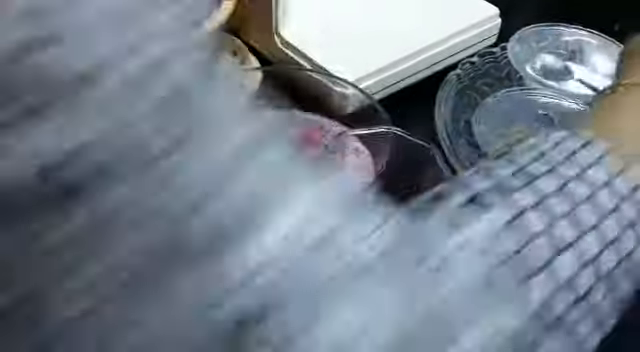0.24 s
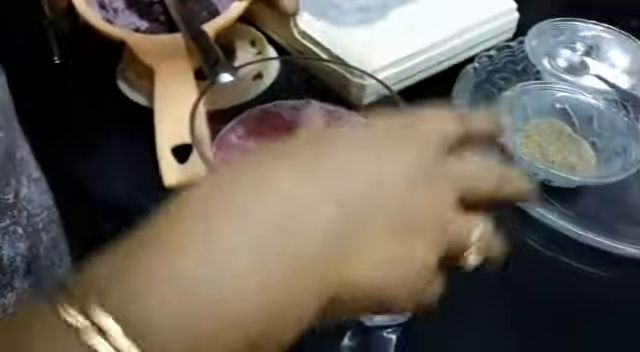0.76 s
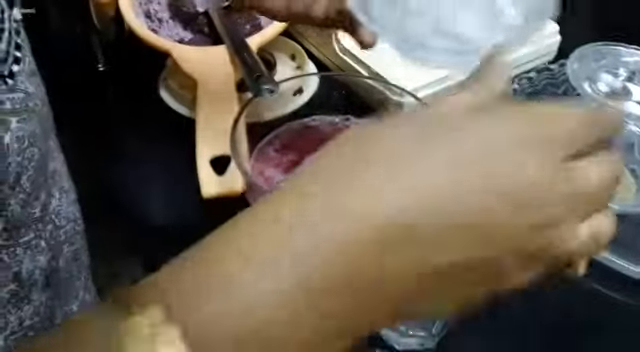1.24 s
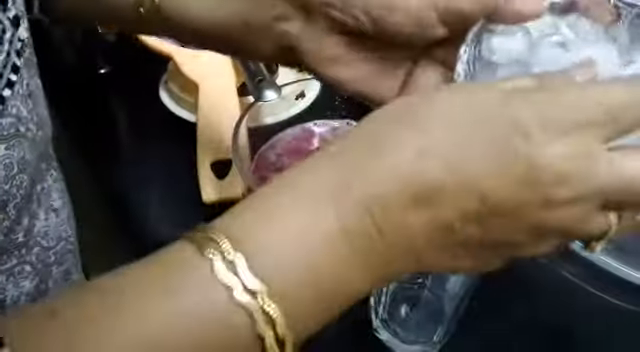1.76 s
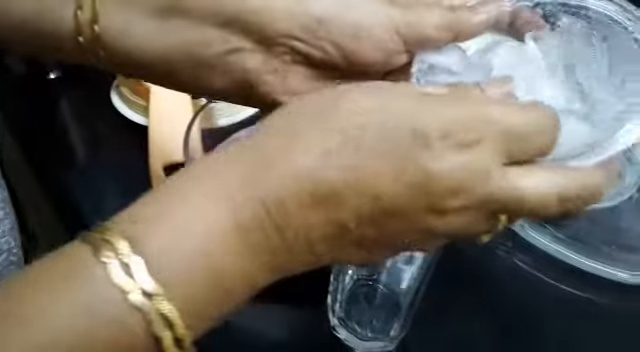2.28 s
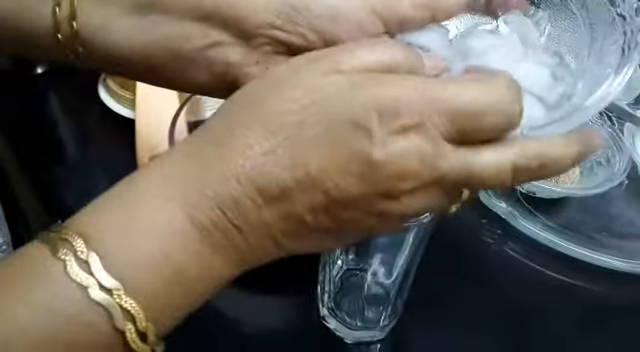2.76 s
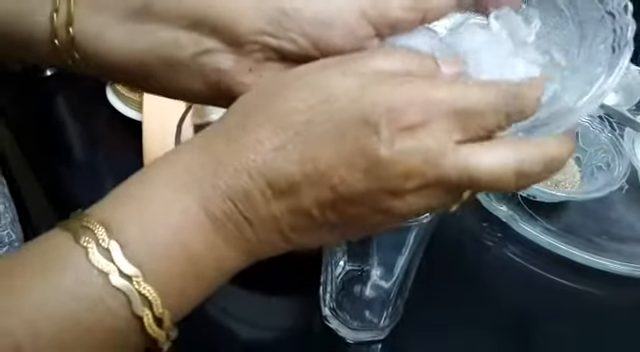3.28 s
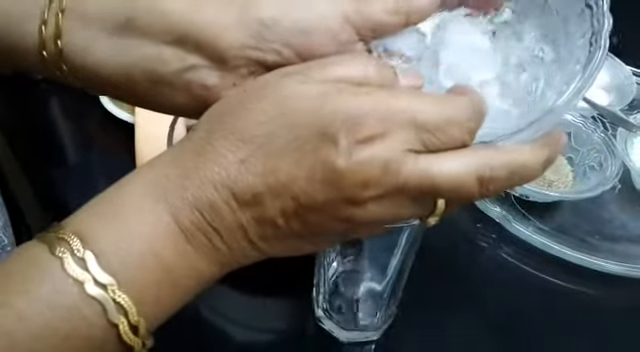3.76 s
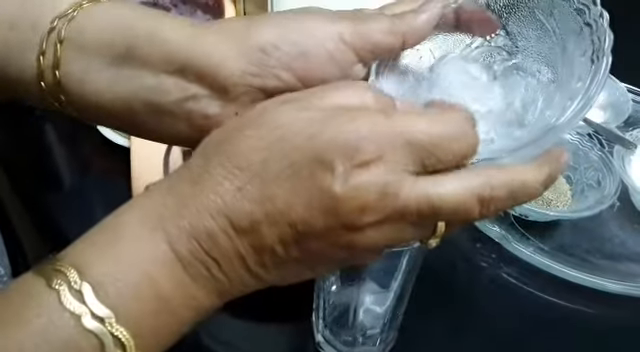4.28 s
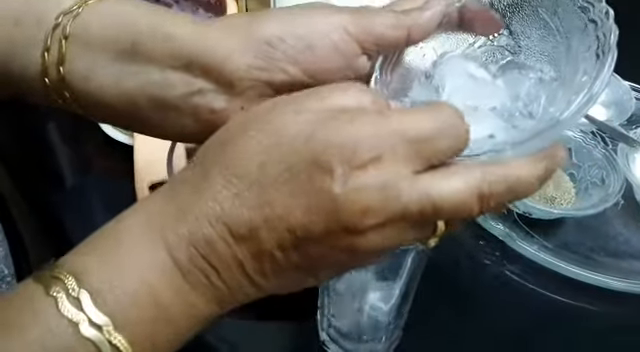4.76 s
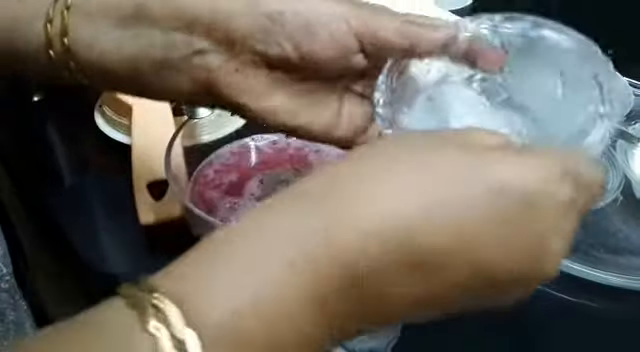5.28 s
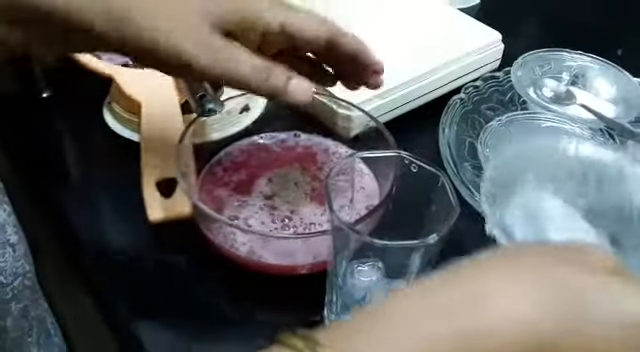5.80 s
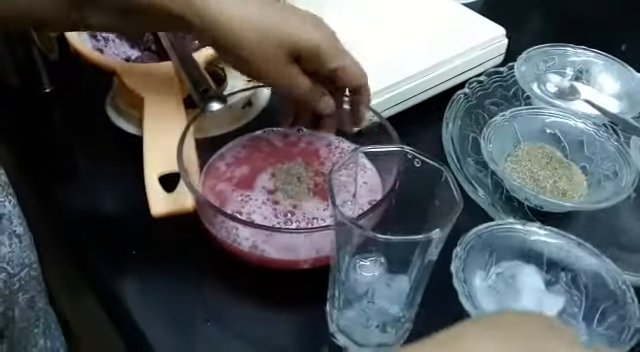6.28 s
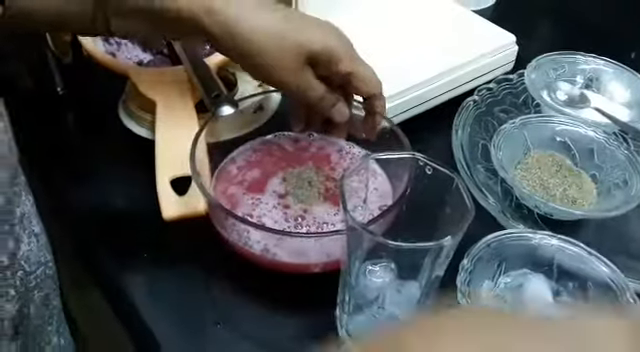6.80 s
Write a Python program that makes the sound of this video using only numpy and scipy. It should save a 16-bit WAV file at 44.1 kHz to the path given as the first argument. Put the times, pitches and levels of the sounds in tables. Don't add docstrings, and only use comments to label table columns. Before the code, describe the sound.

Close phone pickup in a small, hard kitchen with faint hum and hiss. A dish and metal spoon clatter rapidly to rest, then a tumbler is set down with soft knocks. Wet ice slides and ticks in a glass bowl; a few cubes drop into the tumbler, then a heavier cascade clacks and clinks. The bowl is moved, softly shifting its ice, and lands with hard, dull knocks.

```python
import sys
import numpy as np
from scipy import signal
from scipy.io import wavfile
from scipy.ndimage import uniform_filter1d, minimum_filter1d

SR = 44100
rng = np.random.default_rng(int(sys.argv[2]) if len(sys.argv) > 2 else 0)


def to_wav(s):
    ch = np.atleast_2d(s).T
    pcm = np.round(np.clip(ch, -1, 1) * 32767)
    wavfile.write(sys.argv[1], SR, pcm.astype(np.int16))


def level_to_linear(level):
    exponent = np.asarray(level, float) / 20
    return 10 ** exponent


N = 310905

# (time [s], first ring peak [dB], second, third and fourth ring against the first [dB])
CLINKS = [(1.1945, -42, -18, -33, -48), (2.3665, -20.5, 1.5, -22, -28), (2.5018, -46.5, -10, 10.5, -17),
          (2.94, -50, 12.5, -9, -9.5), (3.7712, -20.5, 9.5, -22.5, -18), (3.843, -42, -17, -11.5, -32),
          (4.0611, -18.5, -30, -24, -14.5), (4.0904, -22.5, -0.5, -23, -10.5),
          (4.156, -26, -5, -4.5, -12.5), (4.1676, -23.5, -2, -9.5, -7.5), (4.2372, -22.5, -2.5, -3.5, -2),
          (4.266, -22, -12, -10, -47), (4.648, -39.5, -10, -32.5, -12.5), (4.6799, -28.5, 6.5, -4, -12),
          (4.7147, -18, -16.5, 0.5, -9.5), (4.7852, -29, -5, -13.5, -27.5), (4.826, -30, -3.5, -13, -13),
          (4.8613, -28, -7, 5, -4), (4.8804, -25, -6.5, -5, -38), (4.905, -26.5, -19.5, -37, -30),
          (4.9506, -31.5, -19, -8, -30)]
# (frequency [Hz], level [dB], t60 [s])
TUMBLER_MODES = [
    [(2474, 0, .2), (2486, -1.5, .17)],
    [(4181, 0, .09), (4193, -1.5, .08)],
    [(6690, 0, .07), (6625, -3, .05), (6810, -8, .03), (7180, -12, .04), (7450, -12, .02)],
    [(8600, 0, .06), (9600, -12, .02), (10850, -6, .035), (12000, -11, .025), (12800, -7, .035),
     (14600, -12, .025)],
]
RING_EMPTY, RING_FILLED, FILLED_S = 1, 0.35, 3.5
# (start [s], peak [s], end [s], peak level [dB], fall [dB])
RUBS = [
    (1.197, 1.263, 1.4, -53, 15),
    (2.864, 2.96, 3.09, -58.5, 6),
]
# (time [s], clack peak [dB], thud and crack against the clack [dB])
DROPS = [(2.4618, -24.5, 3.5, -26), (2.471, -32, 1, -23), (2.4828, -17, -4, -7.5), (2.5032, -23, -6, -8),
         (2.5115, -30, 1, -22), (2.5265, -34, -3, -24), (3.8334, -28, 3, -20.5), (3.8395, -9, -9.5, -25.5),
         (3.8472, -13, -12.5, -22.5), (3.8542, -17.5, 0, -19.5), (3.872, -25, -6.5, -25),
         (3.8805, -24.5, -4, -27.5), (3.9075, -25, 2.5, -23), (3.9238, -19.5, -14.5, -24.5),
         (3.9455, -27.5, 5, -23.5), (4.0362, -31, -9, -16.5), (4.061, -21.5, 8, -0.5),
         (4.1538, -5, -6.5, -21.5), (4.173, -19.5, -6.5, -19.5), (4.1825, -12.5, -9, -18),
         (4.189, -12.5, -12, -7.5), (4.195, -19, -11.5, -18.5), (4.2625, -11, -7, -7),
         (4.2674, -12.5, -15.5, -15.5), (4.2734, -16.5, -5, -2.5), (4.295, -25, -12, -14.5),
         (4.6795, -15, 1.5, -20), (4.685, -17.5, -7.5, -26), (4.7126, -13.5, -10, -12.5),
         (4.7466, -27, 10, -12.5), (4.7535, -24.5, 1, -21.5), (4.785, -25, -8, -18), (4.8005, -23, -7, -19),
         (4.8262, -24.5, 0, -9), (4.841, -25.5, 5, -12), (4.8455, -22, 0, -2.5), (4.853, -19.5, -3, -14.5),
         (4.8595, -13, -10.5, -7.5), (4.879, -20.5, -3, -16), (4.883, -22, -4.5, -16),
         (4.9065, -22.5, -2, -30), (4.9352, -21.5, -2.5, -26), (4.951, -36, -6, -23)]
# (time [s], clack peak [dB])
TICKS = [(1.4222, -56), (1.56, -41), (1.883, -55), (1.8937, -40), (1.9145, -28.5), (1.922, -30.5),
         (1.9642, -30), (1.982, -33), (1.9963, -26), (2.136, -30.5), (2.2373, -34), (2.2555, -29.5),
         (2.2642, -31), (2.2736, -28), (2.3035, -33), (2.321, -31.5), (2.693, -53), (2.7122, -36),
         (2.793, -43), (3.3986, -46), (3.418, -44), (3.4874, -34.5), (3.5676, -39.5), (3.6185, -38.5),
         (3.6584, -36), (3.689, -30.5), (4.4991, -32), (4.572, -43), (4.6048, -28)]
# (time [s], clack peak [dB])
SNAPS = [
    (2.0547, -34.5),
    (3.022, -34.5),
    (3.987, -30.5),
]
TICK_THUD_DB, TICK_CRACK_DB, SNAP_CRACK_DB = -12, -24, -7
# (frequency [Hz], level [dB], t60 [s])
CUBE_MODES = [
    [(2800, -1.5, 0.0079), (3465, -5, 0.018), (4114, -5, 0.015), (4584, -7, 0.018), (5050, 1.5, 0.014),
     (5400, -9, 0.007), (3856, -7, 0.014), (3255, -13.5, 0.012)],
    [(840, -5.5, 0.003), (1190, -7.5, 0.011), (1440, -7, 0.012), (1576, -1.5, 0.012), (1778, -3.5, 0.02),
     (2290, 1.5, 0.015)],
    [(6564, 7, 0.0045), (7340, 0.5, 0.00037), (8860, -3.5, 0.0066), (10140, -1, 0.0042),
     (11250, -0.5, 0.004), (12230, 1, 0.0042), (14200, -23.5, 0.004)],
]
# (start [s], peak [s], end [s], peak level [dB], fall [dB])
SLIDES = [
    (1.871, 1.925, 2.17, -44.5, 17),
    (2.217, 2.264, 2.374, -48.5, 7),
    (3.362, 3.494, 3.66, -64.5, -9.5),
    (4.443, 4.596, 4.63, -43, 3),
    (5.258, 5.271, 5.41, -53, 36),
    (5.985, 6.156, 6.2, -49, 4),
]
# (start [s], peak [s], end [s], peak level [dB], fall [dB])
JOSTLES = [
    (2.44, 2, 2.87, -48.5, 10.4),
    (3.847, 3.94, 3.99, -34, 44),
    (4.148, 4.166, 4.476, -26, 45),
    (4.68, 6.9, 4.3, -41.5, 46),
]
SWELL_DB, SLIDE_THUD_DB, JOSTLE_THUD_DB = 13, -2.5, 3.5
# (time [s], ring peak [dB], thud against it [dB])
SETTLES = [
    (5.2729, -38.5, -5),
    (5.3201, -51, -4),
    (5.9918, -49, -18),
    (6.043, -38.5, -12),
    (6.1029, -29, -11.5),
    (6.1285, -47.5, 11.5),
    (6.1285, -33, -11),
    (6.1536, -36, -7),
]
# (frequency [Hz], level [dB], t60 [s])
BOWL_MODES = [
    [(3800, -5, 0.0059), (4355, 3, 0.0085), (4915, -2, 0.013), (5456, 0, 0.024), (5600, -15, 0.0066),
     (7100, -20, 0.0022)],
    [(1360, -1, 0.0064), (1630, 1.5, 0.007), (2192, -9, 0.044)],
]
# (time [s], peak [dB])
SLUMPS = [
    (5.5427, -47.5),
    (5.567, -46),
    (5.618, -52),
    (5.657, -50),
    (5.676, -51),
    (5.718, -51),
    (5.748, -54),
    (5.764, -44.5),
    (5.778, -49),
    (5.792, -49),
]
# (frequency [Hz], level [dB], t60 [s])
SLUMP_MODES = [
    [(363, -4, 0.017), (717, 3, 0.021), (950, 2.5, 0.027), (1154, -0.5, .02), (1400, -6, .012)],
]
# (time [s], knock peak [dB], edge against it [dB])
STEPS = [
    (0.9832, -40.5, -34),
    (1.0186, -44, -35),
    (1.076, -22, -27),
    (1.1573, -26, -15.5),
    (1.1942, -21.5, -14.5),
]
# (frequency [Hz], level [dB], t60 [s])
FOOT_MODES = [
    [(1136, -9.5, 0.036), (1420, -7.5, 0.029), (1540, -2.5, 0.02), (1855, 7.5, 0.013), (2045, -6, 0.023),
     (2270, 1.5, 0.01)],
    [(2740, -1, 0.0088), (3550, -8, 0.007), (4600, -12, 0.006), (5150, -13, 0.0048)],
]
# (time [s], peak [dB], ring length factor [1])
HOLLOWS = [(0.982, -46, 0.7), (1.075, -41, 0.83), (1.156, -39, 0.97), (1.193, -32.5, 1), (1.266, -37, 0.7),
           (3.945, -32, 0.57), (4.06, -33, 0.9), (4.266, -21.5, 0.18), (4.338, -30.5, 0.35),
           (4.684, -27, 0.16), (4.844, -53, 0.93), (5.782, -44, 0.15)]
# (frequency [Hz], level [dB], t60 [s])
HOLLOW_MODES = [
    [(792.6, -4, 0.12), (877, -9, 0.066)],
]
FILLED_PITCH, FULL_S = 1.07, 4.2
# (time [s], knock peak [dB], edge and bass against it [dB])
KNOCKS = [
    (6.5325, -4.5, -26, -25),
    (6.7447, -17.5, -17.5, -38),
    (6.748, -8, -22.5, -36),
    (6.7585, -16, -24, -33),
    (6.7615, -13.5, -19.5, -31),
    (6.7735, -22, -21, -26),
]
# (frequency [Hz], level [dB], t60 [s])
COUNTER_MODES = [
    [(1074, -10, 0.021), (1220, -8, 0.021), (1622, 2, 0.014), (1720, 8, 0.0054), (1952, -3, 0.012),
     (2165, -3, 0.017), (2550, -12.5, 0.0089)],
    [(2740, 8, 0.016), (3440, -19, 0.039), (3840, 0, 0.02), (3960, 0, 0.016), (4470, 2, 0.017),
     (5150, -13, 0.01), (5480, -3.5, 0.018)],
    [(259, -6, 0.018), (481, -10.5, 0.021)],
]
ROCK_S, ROCK_DB, ROCK_LOSS_DB, ROCK_EDGE_DB, ROCK_BASS_DB = 6.5809, -6.5, 2.5, -30, -21.5
ROCK_GAP_S, ROCK_SHRINK, ROCK_LAST_GAP_S = .017, .62, .0035
# (time [s], body peak [dB], edge against it [dB])
CLATTER = [(0.3092, -21, -4), (0.3135, -20, -14), (0.3195, -17, -10), (0.3245, -16, -10.5),
           (0.329, -11.5, -12), (0.335, -23, -11), (0.3395, -14.5, -12), (0.3465, -18, -12),
           (0.3562, -16, -9.5), (0.3615, -24, -12.5), (0.374, -21, -8), (0.3795, -18.5, -9.5),
           (0.388, -17.5, -8), (0.394, -20, -12), (0.4005, -20, -10.5), (0.4105, -24.5, -6.5),
           (0.4158, -25.5, -7.5), (0.4285, -26.5, -6)]
# (frequency [Hz], level [dB], t60 [s])
DISH_MODES = [
    [(950, -10, 0.016), (1113, -5.5, 0.026), (1287, -9.5, 0.022), (1590, -1, 0.027), (1750, 0, 0.022),
     (1957, -2.5, 0.031), (2190, -5, .02)],
    [(2590, -1, .02), (2840, -2.5, 0.025), (3310, -6, 0.013), (3860, -5.5, .015), (4370, -4.5, .015),
     (4800, -6, .015), (5470, -2.5, 0.022), (6100, -11.5, .01)],
]
# (start [s], peak [s], end [s], peak level [dB], fall [dB])
SHIVER = (0.74, .35, .54, -23, 19)
SHIVER_SWELL_DB, SHIVER_SPOON_DB = 4, -9
# (time [s], low ring peak [dB], middle and top rings against it [dB])
CHATTER = [(0.3077, -24, -12.5, -11.5), (0.3274, -25.5, -5.5, -18.5), (0.335, -25.5, -14, -20),
           (0.3546, -19, -15.5, -20), (0.3755, -21.5, -15, -18), (0.3865, -21.5, -16, -17.5),
           (0.403, -21, -16.5, -19.5), (0.4165, -24, -14, -24), (0.4285, -21.5, -24, -27.5),
           (0.4465, -25, -20, -29), (0.494, -26.5, -20, -32)]
# (frequency [Hz], level [dB], t60 [s])
SPOON_MODES = [
    [(5078, 0, .3), (5014, -4, .2), (4592, -9, .05), (5500, -3, .04), (7144, -22, .06)],
    [(8366, -7, .08), (9383, -5, .07), (9916, -9, .09), (10570, -10, .09), (10970, -9, .07),
     (11400, 0, .045), (12050, -6, .03)],
    [(12880, -4, .06), (13870, -3, .06), (15040, -1, .055)],
]
SPOON_RING = 0.66
# (time [s], peak [dB])
BANGLES = [
    (.5424, -36),
    (.5574, -36),
    (7.0184, -47),
]
# (frequency [Hz], level [dB], t60 [s])
BANGLE_MODES = [
    [(4470, -8, 0.035), (8900, -10.5, .04), (10900, -10, .02), (11980, 1, 0.028), (13100, -9, .025),
     (13900, -9, .02)],
]
UNEVEN_DB = 2
# (frequency [Hz], t60 [s])
KITCHEN_T60 = [(250, 0.99), (700, 0.73), (1700, 0.62), (4600, 0.55), (12000, 0.42)]
# (delay [s], level [dB])
ECHOES = [(.0045, -19.5), (.0072, -11), (0.01, -16), (0.0167, -30), (.021, -31.5)]
GLASS_WET_DB = -2.5
# (frequency [Hz], gain [dB])
MIC_GAIN = [(60, -8), (200, 3.5), (700, -4), (5000, -0.5), (5650, -5), (6000, -2.5), (8000, -1),
            (9000, -1.5), (16000, -1.5)]
# (frequency [Hz], density [dB per Hz])
AIR_SPECTRUM = [(25, -41), (100, -11.5), (160, -6), (260, -8), (430, -10.5), (600, -17.5), (1650, -20.5),
                (2500, -30), (4500, -41), (6500, -49.5), (8400, -38), (10500, -32.5), (15600, -33.5),
                (15900, -64)]
# (frequency [Hz], side against mid [dB])
SIDE_AIR = [(30, -10.5), (120, -20.5), (500, -15.5), (1650, -11.5), (5000, 1.5), (8000, -3), (15000, -2.5)]
AIR_DB = -57.5
WHINE_HZ, WHINE_WIDTH_HZ, WHINE_DB = 1740, 42, 8.5


def tumbler():
    clinks = [(*row, RING_EMPTY if row[0] < FILLED_S else RING_FILLED) for row in CLINKS]
    struck = blows(clinks, TUMBLER_MODES, detune=0.0045, rise=0.00046, trim_db=[-3.5, -2.5, 7.0, 8.5], uneven_db=3.8)
    return struck + rubs()


def rubs():
    level, _ = levels([stroke(*row, SWELL_DB, 0) for row in RUBS])
    size = round(RUBS[-1][2] * SR)
    return level * slips(TUMBLER_MODES[0], 400, 3, .1, .2, size=size, count=3)


def ice():
    ticks = [(*row, TICK_THUD_DB, TICK_CRACK_DB) for row in TICKS]
    snaps = [(*row, TICK_THUD_DB, SNAP_CRACK_DB) for row in SNAPS]
    clacks = DROPS + ticks + snaps
    return blows(clacks, CUBE_MODES, detune=0.086, rise=0.00019, trim_db=[-4, -3, 3], skid=.004) + slides()


def slides():
    in_bowl = [stroke(*row, SWELL_DB, SLIDE_THUD_DB) for row in SLIDES]
    in_tumbler = [stroke(*row, SWELL_DB, JOSTLE_THUD_DB) for row in JOSTLES]
    level, thud = levels(in_bowl + in_tumbler)
    size = round(SLIDES[-1][2] * SR)
    clack, low, crack = (slips(modes, 2000, 3.4, 0.065, 0.8, size=size, count=6) for modes in CUBE_MODES)
    return level_to_linear(-7.0) * (level * (clack + level_to_linear(-5.5) * crack) + thud * low)


def bowl():
    touches = blows(SETTLES, BOWL_MODES, detune=0.054, rise=0.00044, trim_db=[-1.5, -2.5])
    return touches + blows(SLUMPS, SLUMP_MODES, detune=0.18, rise=.002, trim_db=[0], uneven_db=5)


def foot():
    return blows(STEPS, FOOT_MODES, detune=0.047, rise=0.0019, trim_db=[-1.5, 1.5])


def hollow():
    fuller = [[(hz * FILLED_PITCH, db, t60) for hz, db, t60 in HOLLOW_MODES[0]]]
    early = [row for row in HOLLOWS if row[0] <= FULL_S]
    late = [row for row in HOLLOWS if row[0] > FULL_S]
    out = blows(early, HOLLOW_MODES, detune=0.13, rise=0.002, trim_db=[-3])
    return out + blows(late, fuller, detune=0.13, rise=0.002, trim_db=[-3])


def counter():
    return blows(KNOCKS + rocking(), COUNTER_MODES, detune=0.065, rise=0.00051, trim_db=[-1.5, 5, 1.5])


def rocking(count=9):
    k = np.arange(count)
    gaps = ROCK_LAST_GAP_S + ROCK_GAP_S * ROCK_SHRINK ** k
    times = ROCK_S + np.cumsum(gaps) - gaps
    return [(s, ROCK_DB - ROCK_LOSS_DB * n, ROCK_EDGE_DB, ROCK_BASS_DB) for n, s in enumerate(times)]


def dish():
    clatter = blows(CLATTER, DISH_MODES, detune=.05, rise=0.00053, trim_db=[-4, 3], uneven_db=5)
    level, spoon_level = levels([stroke(*SHIVER, SHIVER_SWELL_DB, SHIVER_SPOON_DB)])
    size = SR // 2 + 2000
    body, edge = (slips(modes, 1500, 2.5, .1, .8, size=size) for modes in DISH_MODES)
    spoon_groups = (SPOON_MODES[0], SPOON_MODES[1][:5] + SPOON_MODES[2])
    low, high = (slips(modes, 500, 3.0, .1, .22, size=size) for modes in spoon_groups)
    buzz = body + level_to_linear(-1.5) * edge
    jingle = low + level_to_linear(-2) * high
    return clatter + level_to_linear(-8.5) * (level * buzz + spoon_level * jingle)


def spoon():
    rows = [(*row, SPOON_RING) for row in CHATTER]
    return blows(rows, SPOON_MODES, detune=0.0053, rise=0.00074, trim_db=[-5, 3, 4], uneven_db=4.5)


def bangles():
    return blows(BANGLES, BANGLE_MODES, detune=.01, rise=.0004, trim_db=[0])


def blows(rows, body, detune, rise, trim_db, skid=0, uneven_db=UNEVEN_DB):
    out = np.zeros(N)
    luck = rng.standard_normal((len(rows), len(body), 2, 8))
    again = rng.random((len(rows), 3))
    for (s, db, *rest), lucks, late in zip(rows, luck, again):
        longer = max(rest[-1], .1) if len(rest) == len(body) else 1
        for modes, rel_db, trim, one in zip(body, [0, *rest], trim_db, lucks):
            sound = level_to_linear(db + rel_db + trim) * ring(modes, longer, one, detune, uneven_db, rise)
            add(out, s, sound)
            if skid > 0:
                for share in late:
                    add(out, s + skid * share, np.clip((db + 45) / 40, 0, .6) * sound)
    return out


def ring(modes, longer, luck, detune, uneven_db, rise):
    hz, db, t60 = np.transpose(modes)[:, :, None]
    t = np.arange(int(SR * min(t60.max() * longer, .4)) + 64) / SR
    pitch, strength = luck[:, :len(modes), None]
    hz = hz * (1 + detune * pitch * np.minimum(.012 / t60, 1))
    decay = level_to_linear(db + uneven_db * strength - 60 * t / (t60 * longer))
    wave = (decay * np.sin(2 * np.pi * hz * t)).sum(0)
    wave = wave * (1 - np.exp(-t / rise)) ** 2
    return wave / abs(wave).max()


def slips(modes, per_s, spread_db, detune, longer, size=N, count=8):
    strength = level_to_linear(spread_db * np.minimum(rng.exponential(1, size), 5))
    strength = strength * (rng.random(size) < per_s / SR)
    place = rng.integers(0, count, size)
    luck = rng.standard_normal((count, 2, 8))
    rings = [ring(modes, longer, one, detune, uneven_db=4, rise=.0002) for one in luck]
    out = sum(signal.oaconvolve(strength * (place == k), r)[:size] for k, r in enumerate(rings))
    return np.pad(evened(out), (0, N - size))


def stroke(start, peak, end, db, fall_db, swell_db, share_db):
    return [(start, db - swell_db, share_db), (peak, db, share_db), (end, db - fall_db, share_db)]


def levels(tables):
    t, out = np.arange(N) / SR, np.zeros((2, N))
    for rows in tables:
        s, db, share_db = np.transpose(rows)
        inside = np.clip(np.minimum((t - s[0]) / 0.0022, (s[-1] - t) / 0.015), 0, 1)
        out += inside * level_to_linear([np.interp(t, s, db), np.interp(t, s, db + share_db)])
    return out


def add(mix, s, sound):
    part = mix[round(s * SR):][:len(sound)]
    part += sound[:len(part)]


def evened(x):
    return x / np.sqrt(np.mean(x ** 2) + 1e-20)


def read(points, hz):
    f, value = np.transpose(points)
    return np.interp(np.log(hz + 1), np.log(f + 1), value)


def microphone(x):
    log_gain = np.log(level_to_linear(read(MIC_GAIN, abs(np.fft.fftfreq(2048, 1 / SR)))))
    taps = np.fft.ifft(np.exp(np.conj(signal.hilbert(log_gain)))).real
    return signal.oaconvolve(x, taps[:1024])[:N]


def kitchen(x, far, tail_db, side_db):
    taps = np.zeros((4, SR))
    at = np.arange(260, SR - 20, 20) + rng.integers(0, 20, (4, (SR - 261) // 20))
    np.put_along_axis(taps, at, rng.choice([-1., 1.], at.shape), 1)
    hz, t, z = signal.stft(taps, SR, nperseg=256)
    tail = signal.istft(z * level_to_linear(-60 * t / read(KITCHEN_T60, hz)[:, None]), SR, nperseg=256)[1]
    tail *= level_to_linear(tail_db) / np.linalg.norm(tail[0])
    turn = 2 * np.pi * (3 * np.arange(N) / SR + np.arange(3)[:, None] / 3)
    fed = np.vstack([far * np.sqrt(2 / 3) * np.cos(turn), far])
    wet = signal.fftconvolve(fed, tail, axes=1)[:, :N]
    mid = x + wet[:3].sum(0)
    for s, db in ECHOES:
        add(mid, s, level_to_linear(db) * x)
    side = level_to_linear(side_db) * wet[3] + level_to_linear(-27) * np.gradient(mid)
    return mid + side * np.array([[1], [-1]])


def air():
    frames, hz = N // 256 + 5, np.fft.rfftfreq(1024, 1 / SR)
    a, b, c, d, patches = rng.standard_normal((frames, 513, 5)).T
    patches = evened(uniform_filter1d(uniform_filter1d(patches, 14, 0), 30, 1))
    mid = a + 1j * b
    side = (c + 1j * d) * level_to_linear(read(SIDE_AIR, hz))[:, None]
    z = np.array([mid + side, mid - side]) * level_to_linear(1.4 * patches)
    whine_db = WHINE_DB * np.exp(-((hz - WHINE_HZ) / WHINE_WIDTH_HZ) ** 2)
    z *= level_to_linear(read(AIR_SPECTRUM, hz) + whine_db)[:, None]
    return level_to_linear(AIR_DB) * evened(signal.istft(z, nperseg=1024, noverlap=768)[1][:, :N])


def scene():
    glass = microphone(tumbler())
    rest = microphone(ice() + bowl() + foot() + hollow() + counter() + dish() + spoon() + bangles())
    return kitchen(glass + rest, level_to_linear(GLASS_WET_DB) * glass + rest, tail_db=-6.0, side_db=-26.0) + air()


def roll_off(x):
    return signal.sosfilt(signal.butter(12, 16820, fs=SR, output="sos"), x)


def record(dry):
    power_db = 10 * np.log10(abs(uniform_filter1d(np.diff(dry.mean(0), prepend=0) ** 2, 64)) + 1e-12)
    ahead_db = -minimum_filter1d(-power_db, size=351, origin=-175)
    mute = uniform_filter1d(np.clip((ahead_db - power_db - 32.0) / 4, 0, 1), size=40)
    bass = signal.oaconvolve(dry, signal.firwin(201, 600, fs=SR)[None], "same")
    muted = bass + (dry - bass) * level_to_linear(-30 * mute)
    hz, _, z = signal.stft(muted, SR, nperseg=1024, noverlap=768)
    band_db = 10 * np.log10(uniform_filter1d(abs(z.mean(0)) ** 2, size=3, axis=0) + 1e-20)
    waver = rng.standard_normal((65, z.shape[2] // 4 + 1)).repeat(8, 0).repeat(4, 1)[:513, :z.shape[2]]
    budget_db = 52 - 11 * (hz > 13200)[:, None] + 5 * waver
    near_db = -minimum_filter1d(-band_db, size=41, axis=0)
    under_db = np.maximum(band_db.max(0) - budget_db, near_db - budget_db + 33) - band_db
    thinned = np.clip(under_db / 3, 0, 1) * (hz > 5900)[:, None]
    z = z * level_to_linear(-25 * thinned) * (hz < 16700)[:, None]
    mix = signal.istft(z, SR, nperseg=1024, noverlap=768)[1][:, :N]
    return roll_off(mix)


dry = scene()
out = record(dry)
to_wav(out)
```